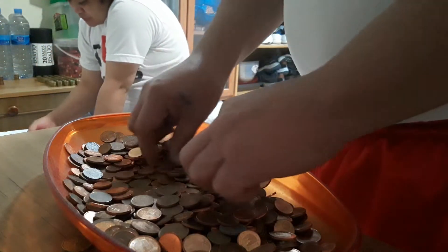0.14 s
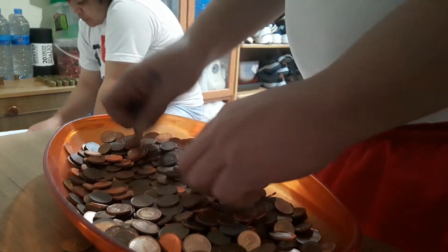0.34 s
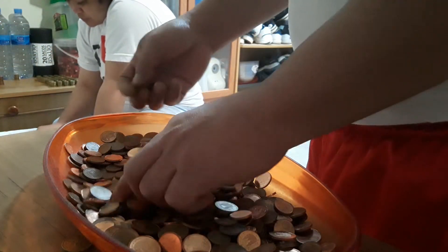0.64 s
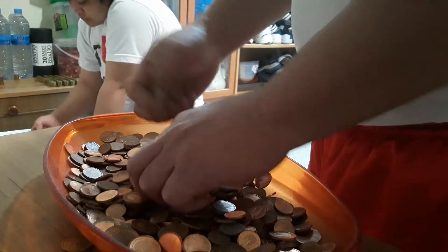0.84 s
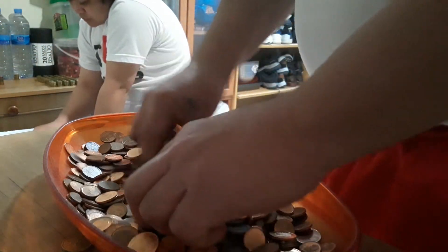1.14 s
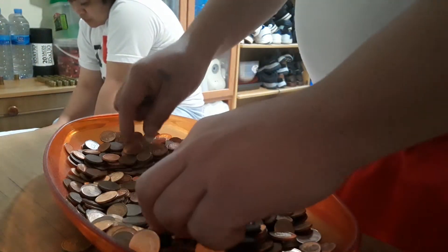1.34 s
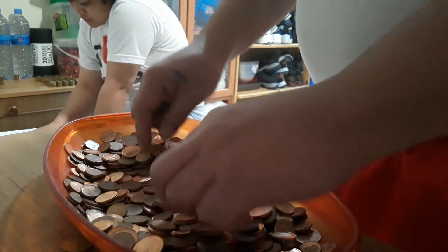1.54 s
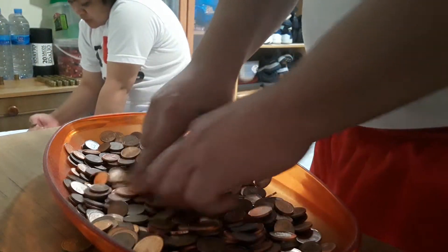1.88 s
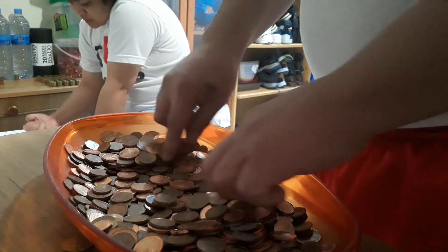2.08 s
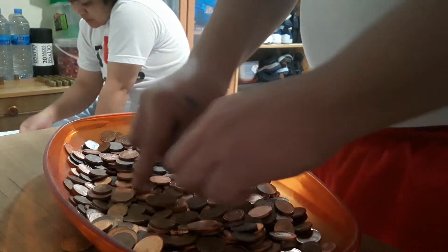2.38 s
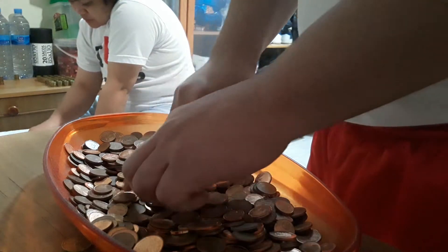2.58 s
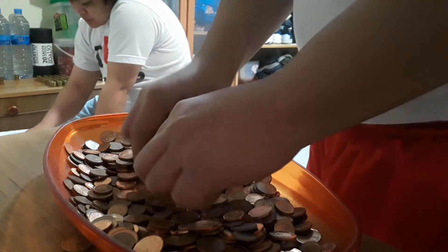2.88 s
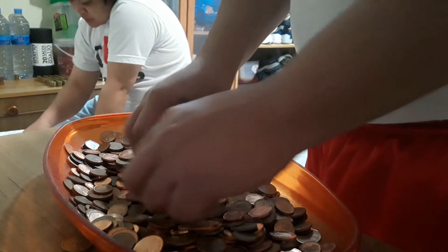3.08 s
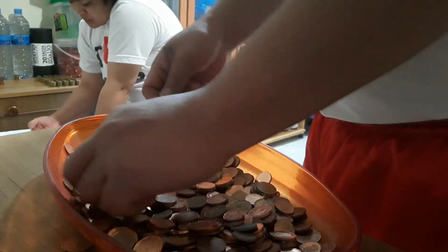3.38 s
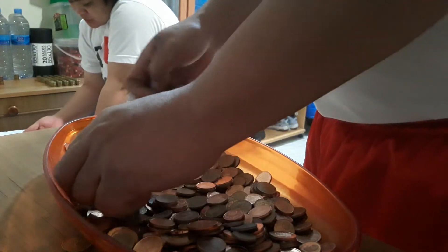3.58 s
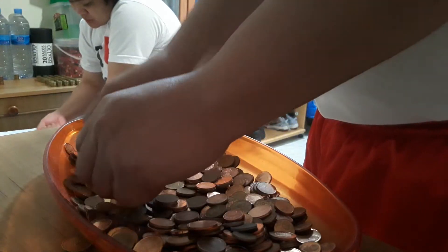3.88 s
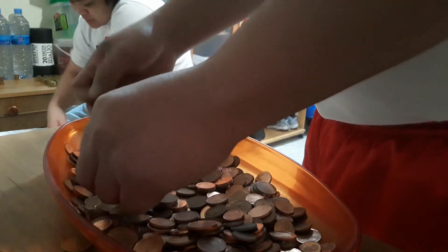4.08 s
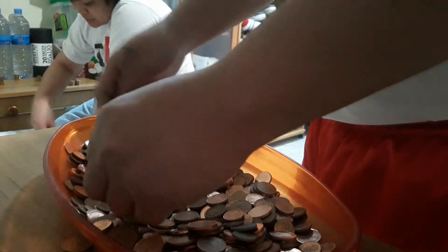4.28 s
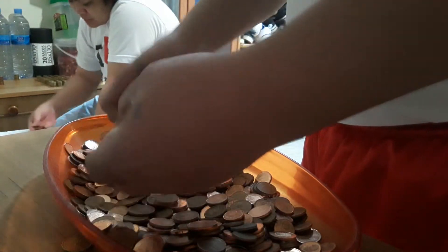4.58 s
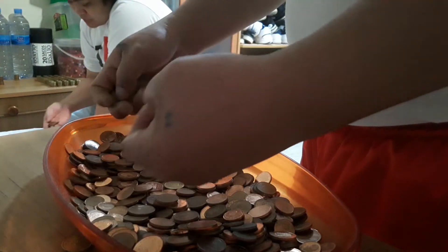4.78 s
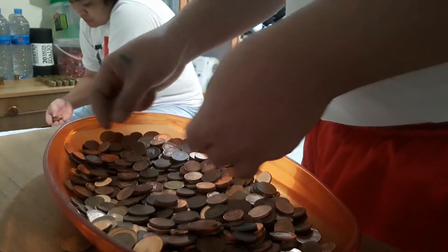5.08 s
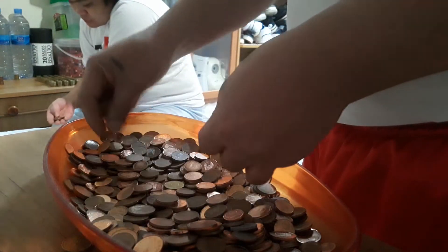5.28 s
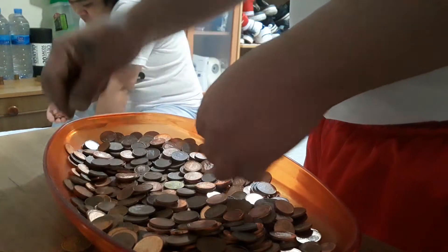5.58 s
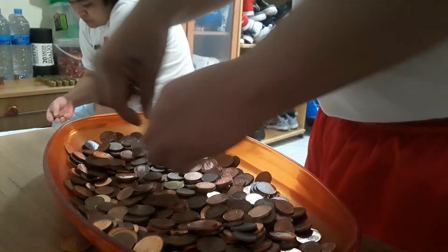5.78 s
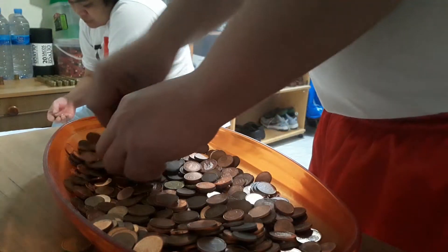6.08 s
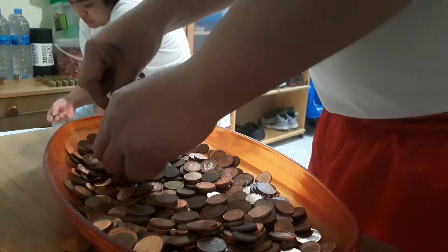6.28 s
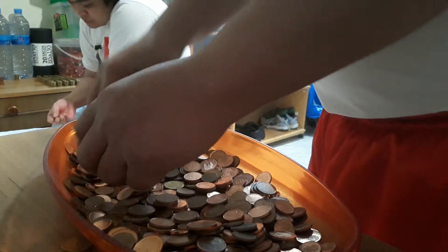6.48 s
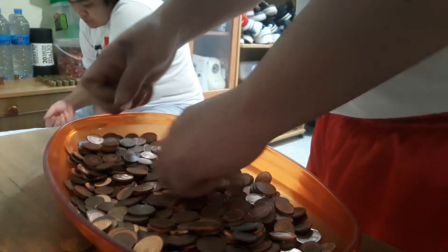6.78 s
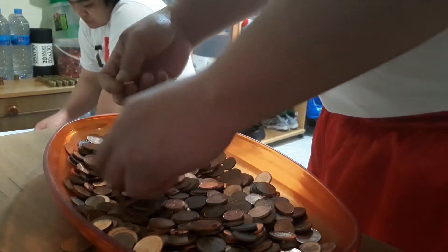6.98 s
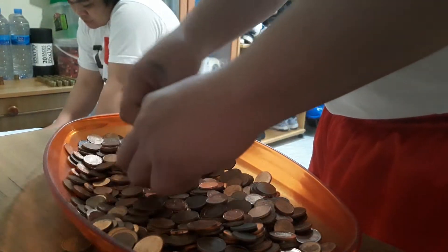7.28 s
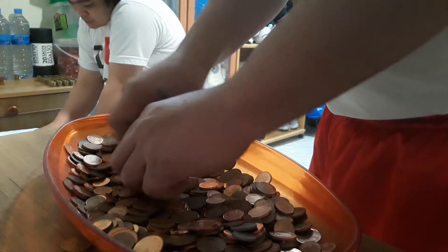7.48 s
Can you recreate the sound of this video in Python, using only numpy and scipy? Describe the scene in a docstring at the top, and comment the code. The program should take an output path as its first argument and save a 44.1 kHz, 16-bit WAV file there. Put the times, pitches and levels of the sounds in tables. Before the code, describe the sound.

Fingers sift a heap of loose coins, heard close in a small, lightly reverberant room. Bursts of crisp metallic chatter follow each stroke, then thin into separate clinks. In the middle come hollow ticks on the plastic wall, soft low thumps and tiny piercing rings; a near lull just after five seconds gives way to heavier raking to the end. Loud peaks are slightly clipped, and quiet room air lies underneath.

```python
"""Two hands rake and pick through a heap of small coins in a plastic tray, heard from close by.
Each stroke excites a dense random train of damped coin contacts, and single clinks stand out above it.
The contacts also knock on the tray modes; bare wall hits, thin high chimes and soft thumps join in.
A small room answers by convolution with decaying noise, over faint air and a narrow-band hum."""
import sys
import numpy as np
from scipy import signal
from scipy.fft import rfft, irfft
from scipy.io import wavfile

SR = 44100
rng = np.random.default_rng(int(sys.argv[2]) if len(sys.argv) > 2 else 0)


def transcribe(u):
    """Save the signal u as a 16-bit wav file named by the first command-line argument.

    u: samples, shape (n,) or (channels, n), limited to [-1, 1]; the rate is SR.
    q: integer samples, one column per channel.
    """
    v = np.clip(np.atleast_2d(u).T, -1, 1)
    q = np.round(v * 32767).astype(np.int16)
    wavfile.write(sys.argv[1], SR, q)


N = 337365


def amp(db):
    """Decibel law: converts a level in dB to an amplitude ratio."""
    return 10 ** (np.asarray(db) / 20)


def unit(x):
    """Energy normalisation: scales the sum of squares to 1."""
    return x / np.sqrt(np.sum(x ** 2) + 1e-20)


def seconds(length):
    """Uniform sampling: the time axis in seconds."""
    return np.arange(int(length * SR)) / SR


def add(mix, start_s, sound):
    """Superposition: adds a sound into the mix in place, cut off at the end."""
    part = mix[max(round(start_s * SR), 0):][:len(sound)]
    part += sound[:len(part)]


def through(x, response):
    """Linear filtering: convolves with an impulse response and keeps the length."""
    return signal.oaconvolve(x, response)[:len(x)]


def read(points, hz):
    """Logarithmic frequency scale: interpolates a table of (Hz, value) along it."""
    f, value = np.transpose(points)
    return np.interp(np.log(hz + 1), np.log(f + 1), value)


def colour(points, size=2048):
    """Minimum phase: the causal impulse response of a spectrum in dB, with energy 1."""
    log_gain = np.log(amp(read(points, abs(np.fft.fftfreq(size, 1 / SR)))))
    # the Hilbert transform of the log gain supplies the phase
    spectrum = np.exp(np.conj(signal.hilbert(log_gain)))
    return unit(np.fft.ifft(spectrum).real)


def band(points):
    """Spectral shaping: steady noise of a given spectrum, with rms 1."""
    gain = amp(read(points, np.fft.rfftfreq(N, 1 / SR)))
    shaped = irfft(rfft(rng.standard_normal(N)) * gain, N)
    return np.sqrt(N) * unit(shaped)


# Spectrum of the room air. Each row: frequency in Hz, relative level in dB.
AIR_SPECTRUM = [(50, -24), (100, -5), (200, -1.5), (320, -11), (450, -9), (800, -17.5), (1200, -27.5),
                (2500, -37), (4800, -22.5), (9000, -32), (15000, -39)]
# Hum in the room. Each row: centre in Hz, offset of the -12 dB points in Hz, level in dB.
HUM_BANDS = [(96.7, 5.4, -72.5), (275.7, 13, -63), (443, 16, -79.5)]


def background(air_db=-63):
    """Narrow-band noise: a bandwidth of a few hertz makes the hum waver above the faint room air."""
    out = amp(air_db) * band(AIR_SPECTRUM)
    for hz, width, db in HUM_BANDS:
        peak = [(hz / 2, -80), (hz - width, -12), (hz, 0), (hz + width, -12), (hz * 2, -80)]
        out += amp(db) * band(peak)
    return out


# Reverberation of the room. Each row: frequency in Hz, time to decay by 60 dB in seconds.
ROOM_DECAY = [(100, 0.12), (400, 0.55), (1200, 0.41), (3000, 0.42), (5000, 0.35), (8000, 0.32),
              (12000, 0.24), (16000, 0.17)]


def reflections(early_db=-12, early_s=0.0019, tail_db=-9, build_s=0.004):
    """Diffuse reflection: quick echoes off arms and table, then a frequency-dependent decay."""
    t = seconds(.6)
    hz, when, z = signal.stft(rng.standard_normal(len(t)), SR, nperseg=256)
    decay = amp(-60 * when / read(ROOM_DECAY, hz)[:, None])
    tail = signal.istft(z * decay, SR, nperseg=256)[1][:len(t)]
    early = rng.standard_normal(len(t)) * np.exp(-t / early_s)
    build = np.minimum(t / build_s, 1)
    return amp(tail_db) * unit(tail * build) + amp(early_db) * unit(early * build)


def room(x, wall_s=.00178, wall_db=-13, shifts_per_s=14, count=7):
    """Time-varying convolution: one fixed tray-wall echo; the other paths shift steadily, as for moving hands."""
    out = x.copy()
    add(out, wall_s, amp(wall_db) * x)
    place = np.arange(N) / SR * shifts_per_s
    for k in range(count):
        # equal-power crossfade: two responses overlap, and all return in a cycle
        share = np.sin(np.pi / 2 * np.minimum((place + k) % count, 2))
        out += through(x * share, reflections())
    return out


# Fingertips that push through to the tray floor. Each row: start in seconds, relative level in dB.
FLOOR_PUSHES = [(0.287, -38), (1.177, -33), (2.924, -26.5), (3.385, -22), (3.84, -45), (4.265, -40),
                (4.724, -43), (4.907, -30.5), (5.974, -28), (6.408, -40), (7.396, -33)]


def thumps(thump_db=-5.5, rise_s=0.0091, low_hz=90, high_hz=160,
           table_hz=97, table_db=-11, table_t60=0.45, count=5):
    """Soft impact: a slow push has only low frequencies, and the table under the tray hums on briefly."""
    out, t = np.zeros(N), seconds(.4)
    table = amp(table_db - 60 * t / table_t60) * np.sin(2 * np.pi * table_hz * t)
    for s, db in FLOOR_PUSHES:
        hz = np.geomspace(low_hz, high_hz, count)[:, None] * rng.lognormal(0, 0.14, (count, 1))
        tones = np.sin(2 * np.pi * (hz * t + rng.random((count, 1)))).sum(0)
        push = tones * t * np.exp(-t / rise_s)
        add(out, s, amp(db + thump_db) * (push / abs(push).max() + table))
    return out


# Coins that strike the bare plastic wall. Each row: start in seconds, relative level in dB.
WALL_STRIKES = [(3.3164, -31), (3.329, -29), (3.3974, -35), (3.5325, -18.5), (3.5575, -18), (3.837, -22),
                (3.8454, -23), (3.9577, -27.5), (4.2635, -24), (5.389, -27), (5.4, -23.5), (5.422, -18.5),
                (5.445, -20.5), (5.479, -29.5), (5.5086, -23), (6.2694, -25), (6.4018, -25),
                (6.5211, -18.5)]
# Ringing of that wall. Each row: frequency in Hz, relative level in dB, 60 dB decay time in seconds.
WALL_RESONANCES = [(1132, -6.5, 0.022), (2170, 0.5, 0.049), (2397, 5.5, 0.048), (2570, -10, .028),
                   (3100, -15, .022)]


def wall(wall_db=-9.5, detune=0.027):
    """Modal decay of a thin plate: a short hollow ring, slightly retuned at every hit."""
    out, t = np.zeros(N), seconds(.1)
    hz, db, t60 = np.transpose(WALL_RESONANCES)[:, :, None]
    for s, hit_db in WALL_STRIKES:
        pitch = hz * rng.lognormal(0, detune, hz.shape)
        decay = amp(hit_db + wall_db + db - 60 * t / t60)
        add(out, s, (decay * np.sin(2 * np.pi * pitch * t)).sum(0))
    return out


def loosened(rattle, per_s, above_db, spread_db):
    """Poisson process: chance events in each stroke; level follows it, plus a set offset and random spread."""
    chance, size = rng.random(N), rng.uniform(-1.1, 1, N)
    at = np.flatnonzero((chance < per_s / SR) & (rattle > 0))
    # rows of start in seconds and relative level in dB
    return zip(at / SR, 20 * np.log10(rattle[at]) + above_db + spread_db * size[at])


# Small coins that come loose and ring thinly. Each row: start in seconds, relative level in dB.
LOOSE_COINS = [(.2977, -22), (.6494, -25), (1.48, -29), (2.7671, -25.5), (3.0889, -27.5), (3.2834, -24),
               (3.6711, -16.5), (4.12, -28), (4.145, -24), (4.1754, -16), (4.2662, -21), (4.3146, -26),
               (4.4468, -26.5), (4.6932, -13), (4.7247, -27.5), (6.3709, -29), (7.0144, -21),
               (7.0494, -23.5)]


def chimes(rattle, chime_db=-8, t60=0.099, rise_s=.002, centre_hz=15380, spread_hz=100, split_hz=70):
    """Beating: a coin free for a moment rings very high up in a close pair of modes."""
    out, t = np.zeros(N), seconds(.25)
    for s, db in [*LOOSE_COINS, *loosened(rattle, per_s=4, above_db=-4.5, spread_db=9)]:
        hz = centre_hz + spread_hz * rng.standard_normal()
        second_hz = hz + split_hz * rng.standard_normal()
        pair = np.sin(2 * np.pi * hz * t) + .5 * np.sin(2 * np.pi * second_hz * t)
        envelope = amp(db + chime_db - 60 * t / t60) * (1 - np.exp(-t / rise_s))
        add(out, s, envelope * pair)
    return out


# Modes of the loaded tray. Each row: frequency in Hz, relative level in dB, 60 dB decay time in seconds.
TRAY_RESONANCES = [(98, -16, 0.032), (140, -2, 0.019), (160, -7, 0.11), (194.5, 0, 0.16), (293, 0.5, 0.21),
                   (312.1, 3.5, 0.19), (404, 0.5, 0.026), (619, 1.5, 0.092), (1280, -0.5, 0.0051)]
# Colour of the knocks in the plastic. Each row: frequency in Hz, relative level in dB.
KNOCK_SPECTRUM = [(40, -47.5), (65, -27), (100, 0.5), (250, -5.5), (400, -0.5), (600, -5), (800, -1),
                  (1100, 2), (1600, -1.5), (2300, -1.5), (3200, -3), (5000, -7), (10000, -49)]


def tray(knocks, boom_db=-7):
    """Modal resonance: the plastic clacks under the heap and booms in its low modes."""
    t = seconds(.25)
    boom = sum(amp(db - 60 * t / t60) * np.sin(2 * np.pi * hz * t) for hz, db, t60 in TRAY_RESONANCES)
    return through(knocks, colour(KNOCK_SPECTRUM)) + amp(boom_db) * through(knocks, unit(boom))


def chatter(t, crack_s, settle_s, settle_db, tick_db):
    """Impact excitation: a sharp tick and crack, then a brief buzz as the neighbouring coins take it up."""
    envelope = np.exp(-t / crack_s) + amp(settle_db) * np.exp(-t / settle_s)
    buzz = unit(rng.standard_normal(len(t)) * envelope)
    return unit(buzz + amp(tick_db) * rng.choice([-1, 1]) * (t == 0))


def knock():
    """Transmission through a granular heap: the dull clack of a contact passed down to the tray."""
    return chatter(seconds(.06), crack_s=0.0022, settle_s=0.015, settle_db=-11, tick_db=-12)


# Ringing of the coins. Each row: frequency in Hz, relative level in dB, 60 dB decay time in seconds
# of a coin lying loose, spread of the frequency from coin to coin as a share.
COIN_RESONANCES = [(3940, -4, 0.038, .1), (4995, -5, 0.054, 0.035), (6140, -12, 0.023, 0.098),
                   (8010, -5, 0.083, 0.041), (9060, 0, 0.073, 0.045), (11700, -2, 0.058, .08),
                   (14300, -10, 0.068, 0.059)]


def ring(t, looseness):
    """Damped modes: one coin rings, cut short by the coins lying on it; looseness scales the decay times."""
    hz, db, t60, spread = np.transpose(COIN_RESONANCES)[:, :, None]
    detune, phase = rng.standard_normal((2, len(hz), 1))
    decay = amp(db - 60 * t / (t60 * looseness))
    pitch = hz * (1 + spread * detune)
    return unit((decay * np.sin(2 * np.pi * (pitch * t + phase))).sum(0))


def toppling(rattle, tray_db=-18, bright_db=-13):
    """Random excitation: further clinks that the strokes scatter among the listed ones."""
    scattered = loosened(rattle, per_s=13, above_db=8.5, spread_db=1)
    return [(s, db, tray_db, bright_db) for s, db in scattered]


# Single coins that drop or snap over. Each row: start in seconds, relative level in dB,
# knock on the tray in dB relative to that level, brightness in dB on an arbitrary scale.
SINGLE_COINS = [(.1206, -13.5, -24, -11), (.164, -13, -7, -14), (.2271, -7, -11.5, -12),
                (.273, -6.5, -5.5, -13), (.445, -20, -19, -2), (.498, -22.5, -4, -10),
                (.5236, -20, -12, -12), (.7153, -8.5, -18, -20.5), (.7727, -10, -17, -18),
                (.9384, -5, -18, 5), (1.145, -2, -28, -8), (1.165, 1.5, -16, -4), (1.2281, -1.5, -12, 3),
                (1.2528, -7.5, -35, -15), (1.324, -17.5, -18, -6), (1.4054, -17, -11, -5),
                (1.4381, -13, -24, -1), (1.4793, -11.5, -19, 4), (1.5132, -17, -4, -9),
                (1.546, -19.5, -4, -8), (1.6522, -18, -8.5, -2.5), (1.72, -20.5, -22, 6),
                (1.7911, -6.5, -18, -5), (1.8528, -14, -3, -21), (1.8932, -3.5, -18, -13),
                (1.9292, 0.5, -25, -15), (1.974, 0, -26, -14), (2.0631, -5.5, -35, -30),
                (2.1723, -7, -32, -37), (2.2943, -26, -16, 4), (2.381, -29.5, -29, -4),
                (2.3976, -9.5, -18, -8), (2.4958, -3.5, -16, -20), (2.538, -7, -10.5, -15),
                (2.6763, -32.5, -8, -18), (2.7273, -31, -5, -18), (2.7677, -28.5, -33, 6),
                (2.9178, -14, -13, -6), (3.1235, -21.5, -30, -20), (3.1552, -17, -17, -18),
                (3.284, -17.5, -36.5, 4), (3.3181, -5, -21, -9), (3.3538, -9.5, -16.5, 5),
                (3.396, -4, -12.5, -4.5), (3.5323, -7, -9.5, -11), (3.5575, -3, -28, -11),
                (3.5682, 1.5, -16.5, -1.5), (3.6315, -11, -7, -7), (3.6716, -13, -40, 9),
                (3.7676, -25.5, -8, -18), (3.8478, -10, -19, -5), (3.904, -6.5, -9.5, -15),
                (3.9575, -8.5, -10.5, -11), (4.0153, -14, -26, -13), (4.0523, -20.5, -23, -29),
                (4.0821, -19.5, -19, -16), (4.12, -13.5, -33, -2), (4.1745, -4.5, -44, 11),
                (4.2638, -5.5, -4.5, -11), (4.3155, -13.5, -7, -2), (4.3884, -18.5, -31, -10),
                (4.4288, -9.5, -9, -4), (4.4454, -6, -26, -5), (4.4874, -10, -5, -6),
                (4.5354, -8, -18, -12), (4.657, -23.5, -34.5, -7.5), (4.693, -12, -44, 4.5),
                (4.725, -10.5, -30, 12), (4.7354, -9.5, -43, 12), (4.8666, -33, -38, 1.5),
                (4.9195, -19, -49.5, 7), (5.0394, -38.5, -26.5, 1), (5.1067, -19.5, -44, 7),
                (5.4016, -9, -35.5, -13.5), (5.5111, -7, -12, -12), (5.8954, -6, -23, -6),
                (5.915, -6, -9.5, -11), (5.9707, 1, -14.5, -12), (6.0548, -2, -28.5, -27),
                (6.0903, -6, -33, -27), (6.1866, -10, -9.5, -5), (6.2241, -8.5, -16, -7),
                (6.2675, -6, -8.5, -15), (6.3906, -12, -8, -8), (6.402, -6, -10, -7),
                (6.5203, -10.5, -18, 2), (6.5449, -14, -21, -25), (6.6444, -8, -12, -6),
                (6.8083, 0, -16, -38), (6.913, -9, -24, -30), (6.9718, -10, -19.5, -12),
                (7.022, -8, -11, -30), (7.1024, -19.5, -19, -18.5), (7.1797, -28, -27, -27.5),
                (7.236, -26, -26, 5), (7.4031, -6.5, -14, -8), (7.4691, -6.5, -29.5, -3),
                (7.612, -8, -23, 3.5)]


def clinks(rattle, clink_db=13, knock_db=12, ring_db=-9, plain_brightness_db=-7, lead_db=-19, lead_s=0.0015):
    """Impact and spectral tilt: coins on top sound thin and bright, deeper ones knock on the tray."""
    coins, knocks = np.zeros((2, N))
    t, lead_t = seconds(.15), seconds(.006)
    for s, db, tray_db, bright_db in [*SINGLE_COINS, *toppling(rattle)]:
        thin_db = bright_db - plain_brightness_db
        low_cut_db = -1.4 * np.clip(thin_db, 0, 14)
        tilt = colour([(2200, low_cut_db), (4500, 0.0076), (7000, 0.0095), (12000, 0.63 * thin_db)], size=256)
        contact = chatter(t, crack_s=0.0025, settle_s=0.009, settle_db=-11, tick_db=-12.5)
        sound = contact + amp(ring_db) * ring(t, looseness=0.67)
        add(coins, s, amp(db + clink_db) * unit(through(sound, tilt)))
        add(knocks, s, amp(db + tray_db + knock_db) * knock())
        # a short swell of noise leads into each clink, softening its attack
        lead = through(rng.standard_normal(len(lead_t)) * np.exp(lead_t / lead_s), tilt)
        add(coins, s - lead_t[-1], amp(db + clink_db + lead_db) * unit(lead))
    return coins, knocks


def jostle(ring_db=-8, looseness=0.21, variety_db=4):
    """Heavy damping: one coin nudged inside the heap barely rings, and has its own colour."""
    t = seconds(.12)
    own = colour([(hz, variety_db * rng.standard_normal()) for hz in np.geomspace(1500, 16000, 8)], size=256)
    contact = chatter(t, crack_s=0.002, settle_s=0.0065, settle_db=-6, tick_db=-13.5)
    sound = contact + amp(ring_db) * ring(t, looseness * rng.lognormal(0, 0.63))
    return unit(through(sound, own))


# Strokes of the hand through the heap. Each row: start in seconds, speeding up in seconds, steady in seconds,
# slowing down in seconds, rattle of the coins in relative dB, knocking on the tray in relative dB.
HAND_STROKES = [(0, 0.0024, 0.011, 0.27, -30, -35), (.12, 0.0044, 0.033, .25, -29, -35),
                (0.223, 0.0037, 0.099, 0.086, -30, -36.5), (.445, 0.0048, 0.013, .12, -41, -46),
                (0.513, 0.031, .18, 0.29, -25.5, -29), (.842, .12, 0.094, 0.12, -23.5, -26),
                (1.038, 0.011, .12, 0.25, -13.5, -21.5), (1.31, .01, 0.12, 0.29, -36, -38),
                (1.652, 0.0058, 0.19, 0.19, -46, -49.5), (1.781, 0.0032, 0.064, 0.077, -23.5, -29),
                (1.875, 0.046, 0.038, 0.43, -13.5, -22.5), (2.159, 0.0063, 0.03, 0.14, -31, -36),
                (2.396, 0.0035, 0.068, 0.12, -26, -33.5), (2.478, 0.006, 0.061, 0.24, -24.5, -30),
                (2.9155, .004, .2, 0.17, -33.5, -39.5), (3.316, 0.0052, 0.011, 0.087, -35.5, -35.5),
                (3.385, 0.0033, 0.0087, 0.089, -22, -28), (3.49, 0.04, 0.0036, 0.21, -31.5, -33),
                (3.553, 0.0026, 0.0077, 0.076, -20.5, -35), (3.775, 0.0035, .012, 0.072, -42, -42.5),
                (3.83, 0.0033, 0.0052, .16, -24, -33.5), (3.954, 0.0032, 0.0087, 0.33, -34, -39),
                (4.135, 0.028, .01, 0.064, -39, -66), (4.263, .003, .012, 0.45, -33, -35),
                (4.422, 0.0062, 0.056, 0.13, -27.5, -37), (4.524, 0.0063, 0.0065, 0.14, -25.5, -31),
                (4.69, 0.0054, 0.059, 0.092, -41, -58.5), (5.387, 0.014, .03, 0.24, -23.5, -33.5),
                (5.504, .005, 0.017, 0.06, -26.5, -35), (5.72, .01, 0.02, 0.27, -58, -57),
                (5.897, 0.018, 0.063, 0.047, -25, -34.5), (5.966, .025, 0.051, 0.23, -15, -24.5),
                (6.18, 0.045, 0.071, .13, -27, -37), (6.39, 0.016, 0.0049, 0.11, -27.5, -34.5),
                (6.52, .003, 0.042, 0.25, -25, -35.5), (6.634, 0.0091, 0.008, 0.14, -31, -36),
                (6.715, 0.095, 0.017, 0.34, -15, -22), (7.013, 0.0052, 0.008, 0.23, -26, -33),
                (7.401, 0.048, 0.079, 0.28, -21.5, -30.5)]


def stirring(entry_speed=0.78, loudness_power=2.98):
    """Power law of speed: each stroke speeds up, holds and slows to rest; gives rattle and knocking strength."""
    rattle_energy, weight_energy = np.zeros((2, N))
    for s, push_s, hold_s, slow_s, coins_db, tray_db in HAND_STROKES:
        corners = np.cumsum([0, push_s, hold_s, slow_s])
        # the fingers meet the heap at a share of full speed
        speed = np.interp(seconds(corners[-1]), corners, [entry_speed, 1, 1, 0])
        strength = speed ** loudness_power
        # overlapping strokes add in energy
        add(rattle_energy, s, (amp(coins_db) * strength) ** 2)
        add(weight_energy, s, (amp(tray_db) * strength) ** 2)
    return np.sqrt([rattle_energy, weight_energy])


def raking(rattle, weight, peak_contacts_per_s=800, crowding=.4, size_db=3.5,
           rattle_db=1.0, knock_db=-2.0, scrape_db=-13, count=48):
    """Random impact train: coins slip over each other, and a stronger stroke moves more of them at once."""
    rate = peak_contacts_per_s * (rattle / rattle.max() + 0.011) ** crowding
    sizes = (rng.random(N) < rate / SR) * amp(size_db * np.minimum(rng.exponential(1, N), 3.5))
    # the work of the hand is shared among the contacts of each moment
    window = signal.windows.hann(1601)
    local_energy = abs(signal.oaconvolve(sizes ** 2, window / window.sum(), "same"))
    sizes /= np.sqrt(local_energy + 0.0018)
    voices = [(jostle(), knock()) for _ in range(count)]
    which = rng.integers(0, count, N)
    # faces that slide on each other give a fine scrape between the contacts
    coins, knocks = amp(scrape_db) * rng.standard_normal((2, N)) * [rattle, weight]
    for at in np.flatnonzero(sizes):
        clink, clack = voices[which[at]]
        add(coins, at / SR, sizes[at] * rattle[at] * clink)
        add(knocks, at / SR, sizes[at] * weight[at] * clack)
    return amp(rattle_db) * coins, amp(knock_db) * knocks


# Colour of the coin sound. Each row: frequency in Hz, relative level in dB.
COIN_SPECTRUM = [(500, -55.5), (1500, -23.5), (2500, -5.5), (3500, -3), (4800, 0), (6500, -2), (8700, -2),
                 (10000, -7.5), (13500, -5.5), (15500, -4.5), (17000, 3)]


def scene():
    """Source and path: coin contacts sound directly, through the tray and by way of the room."""
    rattle, weight = stirring()
    coins, knocks = np.add(raking(rattle, weight), clinks(rattle))
    near = through(coins, colour(COIN_SPECTRUM)) + tray(knocks) + wall() + chimes(rattle)
    return (room(near) + thumps() + background())[None]


def record(dry, low_cut_hz=80, edge_hz=15780):
    """Overload and band limiting: peaks are clipped, then deep bass and the highest treble are removed."""
    limited = np.clip(dry, -.9, .9)
    thinned = signal.sosfilt(signal.butter(5, low_cut_hz, "high", fs=SR, output="sos"), limited)
    low_pass = signal.firwin(601, edge_hz, window=("kaiser", 8), fs=SR)
    return signal.oaconvolve(thinned, low_pass[None], "same")


dry = scene()
out = record(dry)
transcribe(out)
```